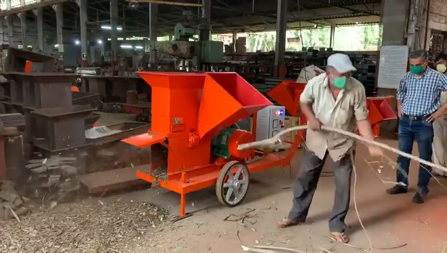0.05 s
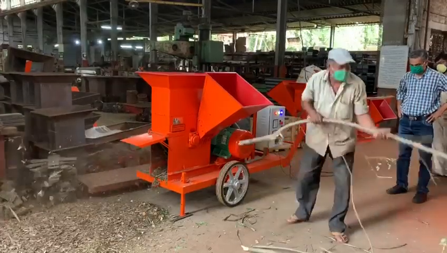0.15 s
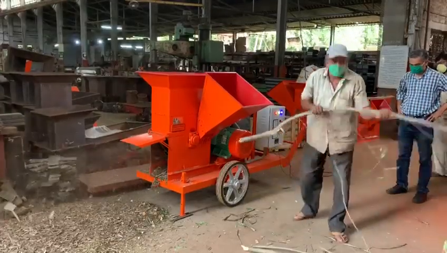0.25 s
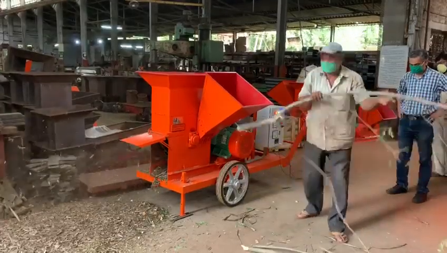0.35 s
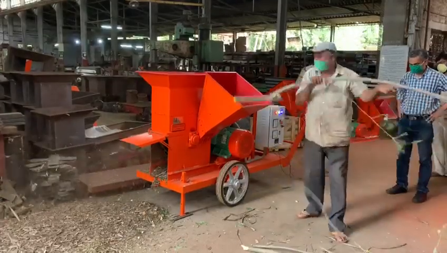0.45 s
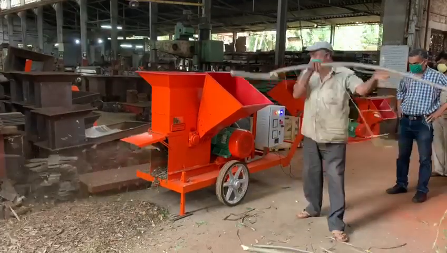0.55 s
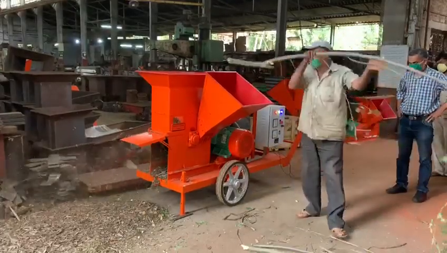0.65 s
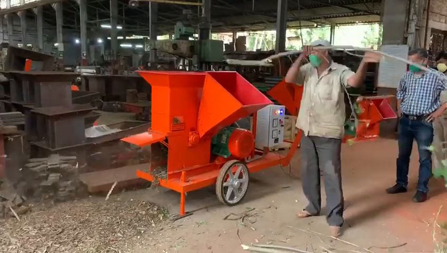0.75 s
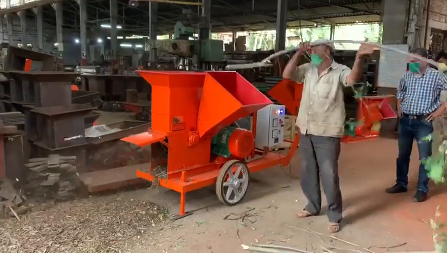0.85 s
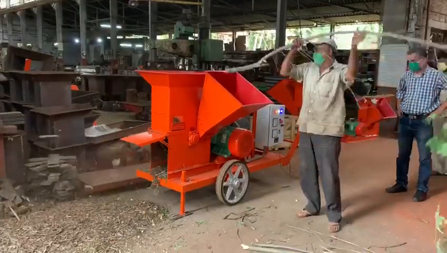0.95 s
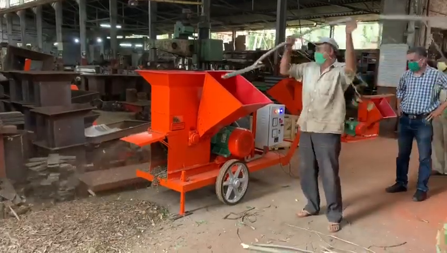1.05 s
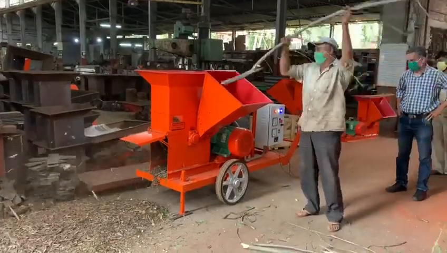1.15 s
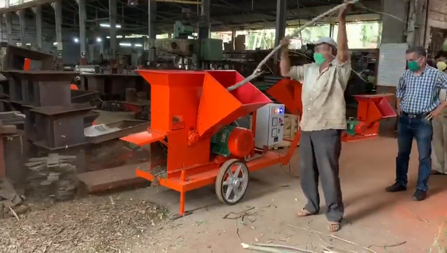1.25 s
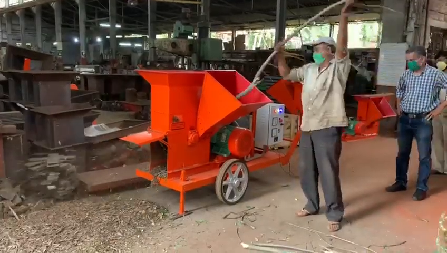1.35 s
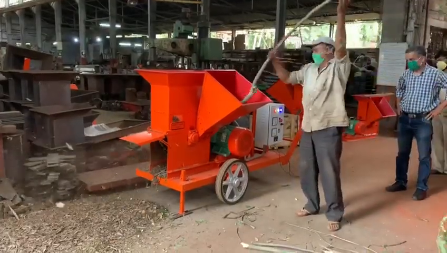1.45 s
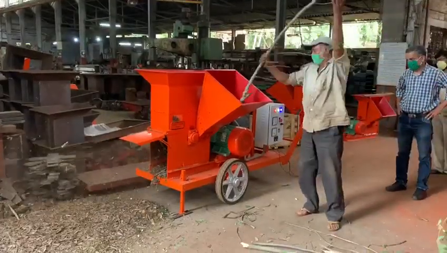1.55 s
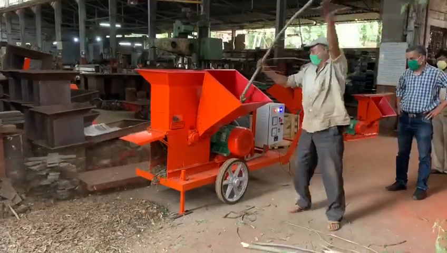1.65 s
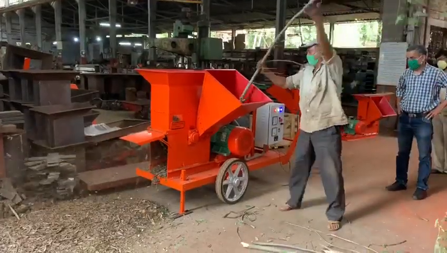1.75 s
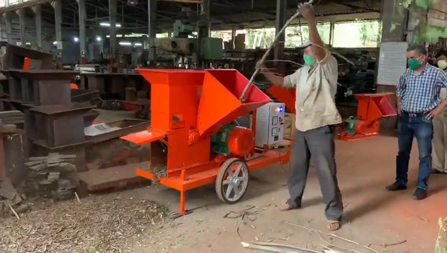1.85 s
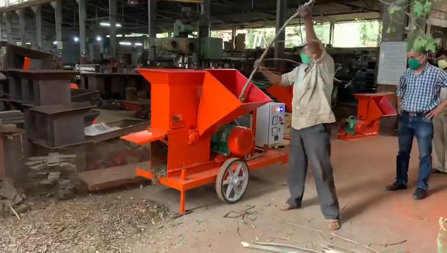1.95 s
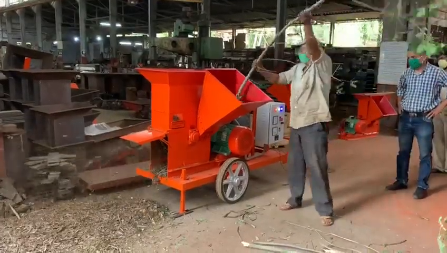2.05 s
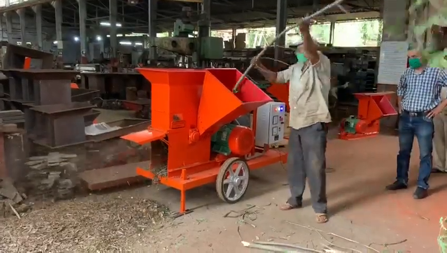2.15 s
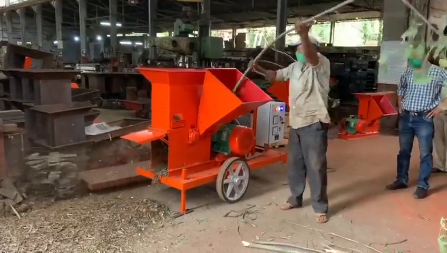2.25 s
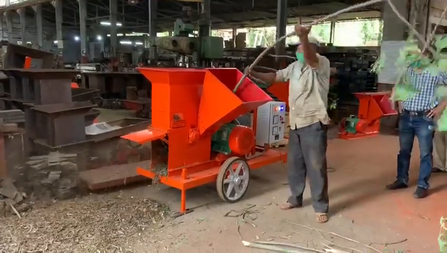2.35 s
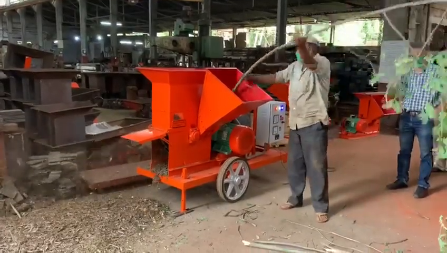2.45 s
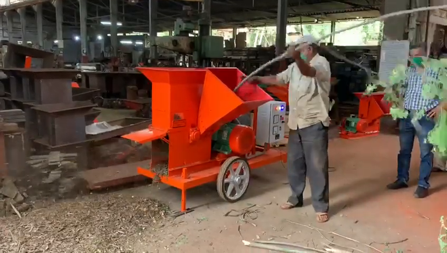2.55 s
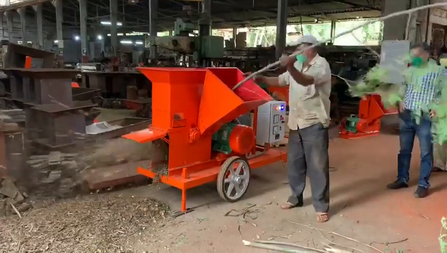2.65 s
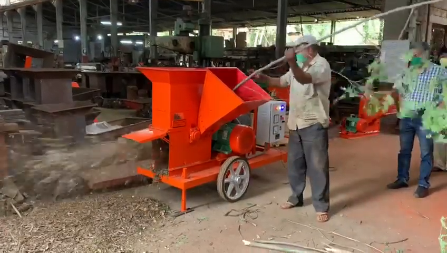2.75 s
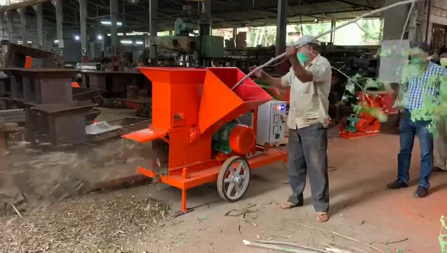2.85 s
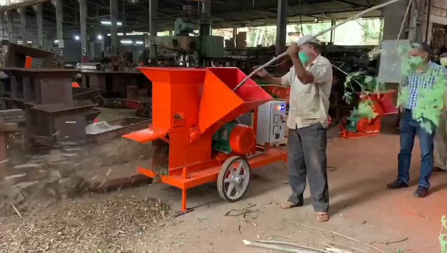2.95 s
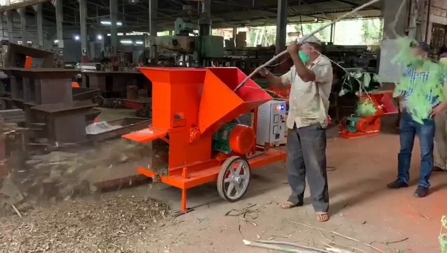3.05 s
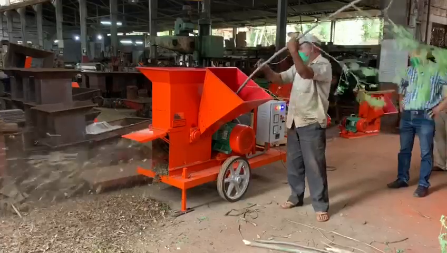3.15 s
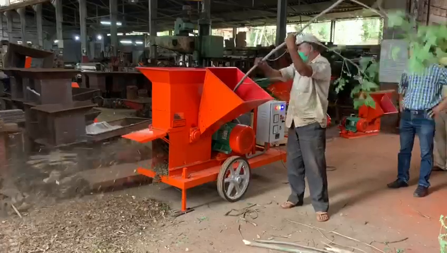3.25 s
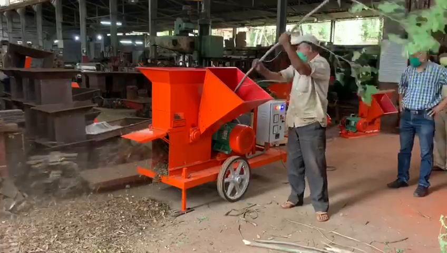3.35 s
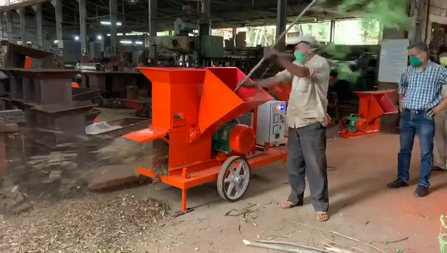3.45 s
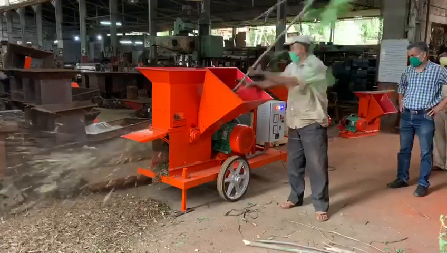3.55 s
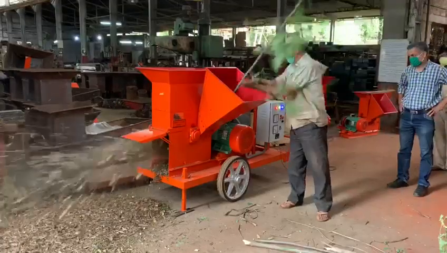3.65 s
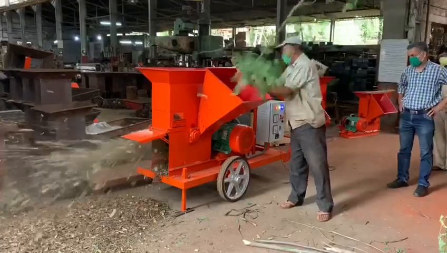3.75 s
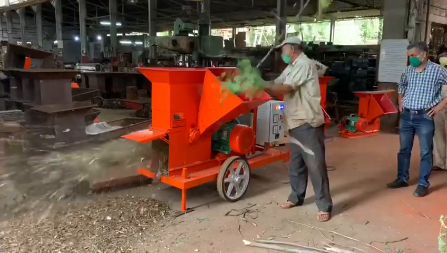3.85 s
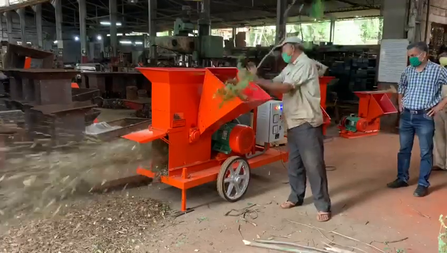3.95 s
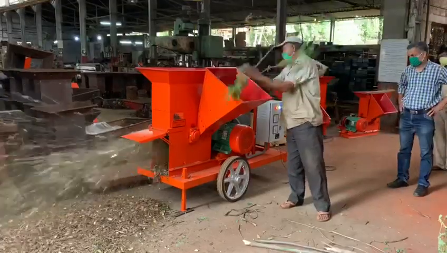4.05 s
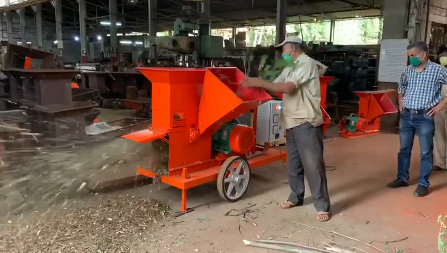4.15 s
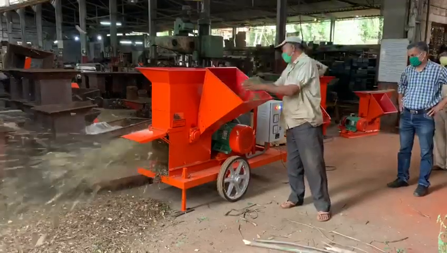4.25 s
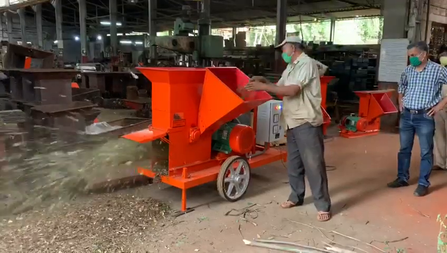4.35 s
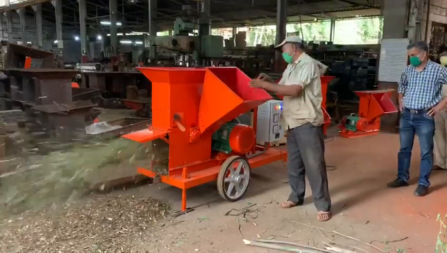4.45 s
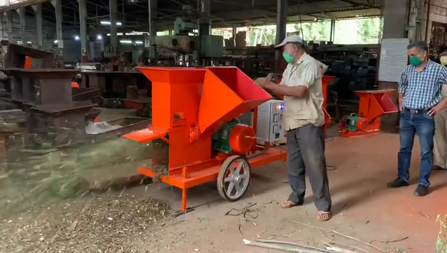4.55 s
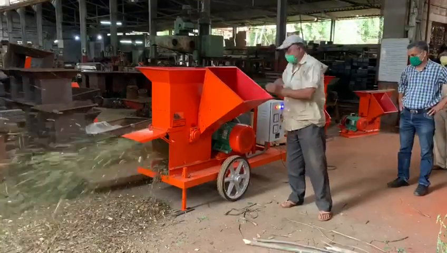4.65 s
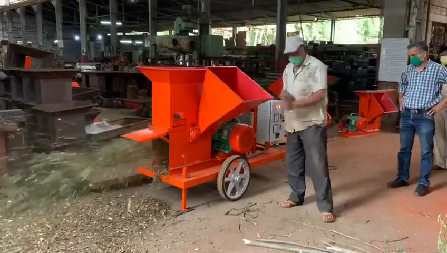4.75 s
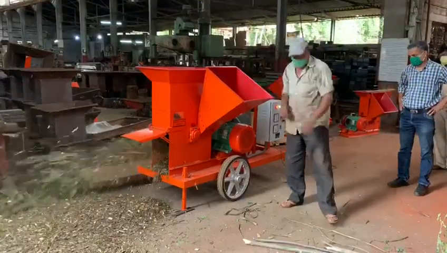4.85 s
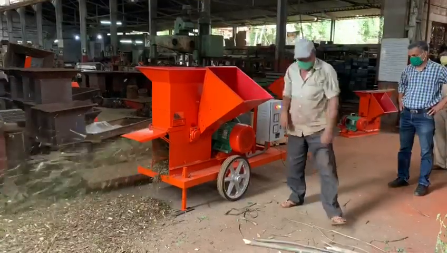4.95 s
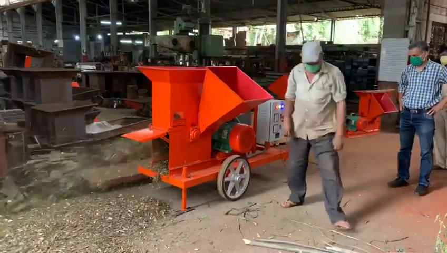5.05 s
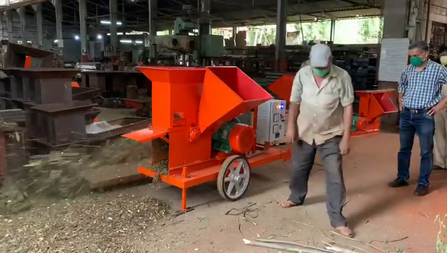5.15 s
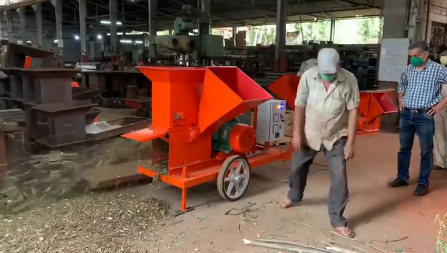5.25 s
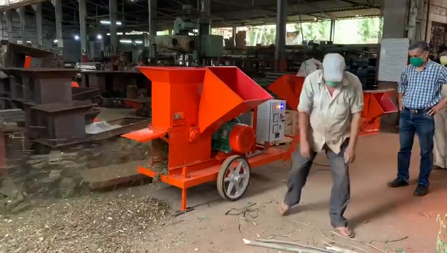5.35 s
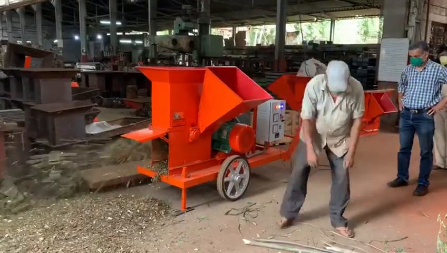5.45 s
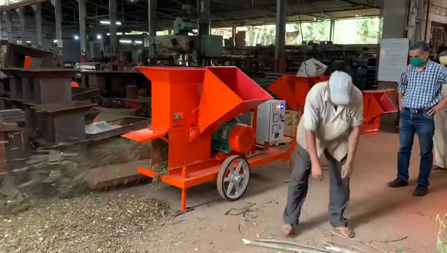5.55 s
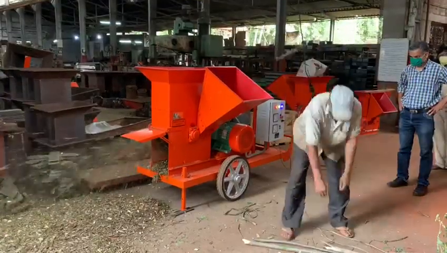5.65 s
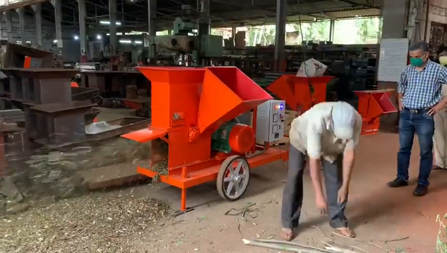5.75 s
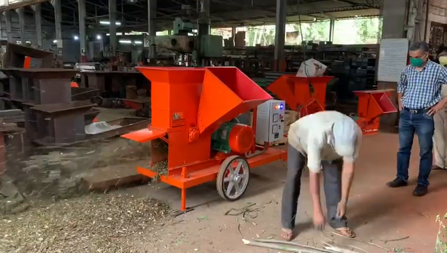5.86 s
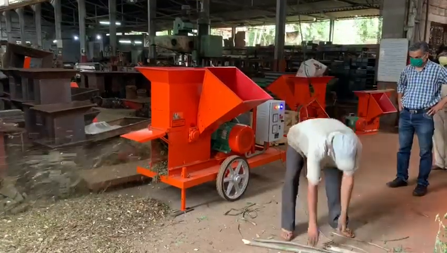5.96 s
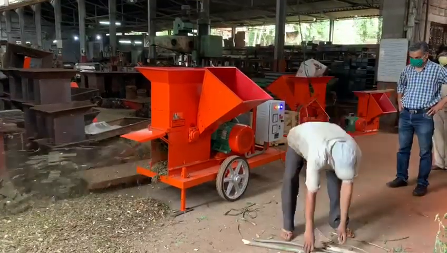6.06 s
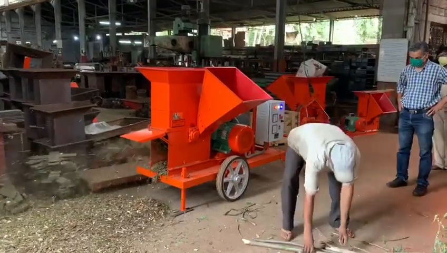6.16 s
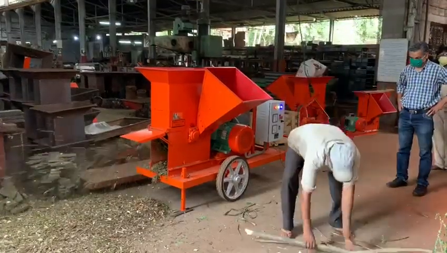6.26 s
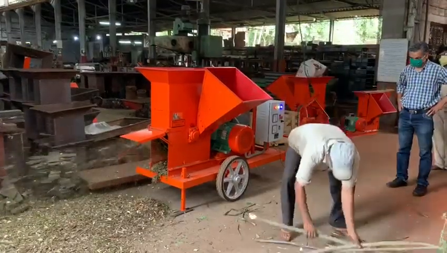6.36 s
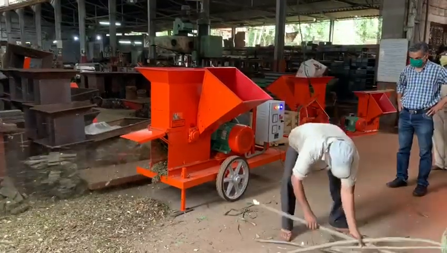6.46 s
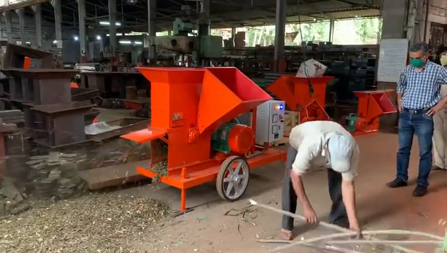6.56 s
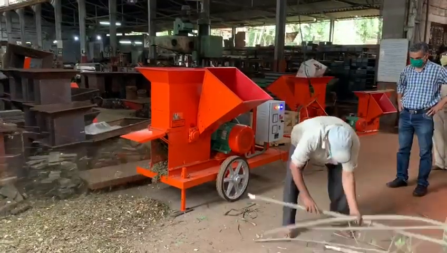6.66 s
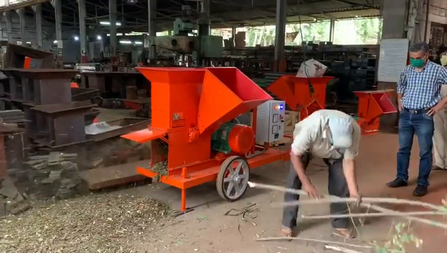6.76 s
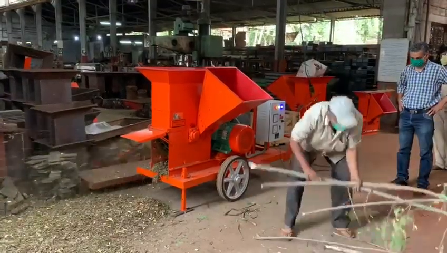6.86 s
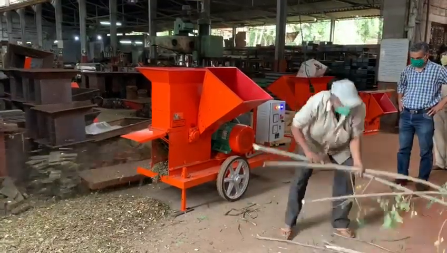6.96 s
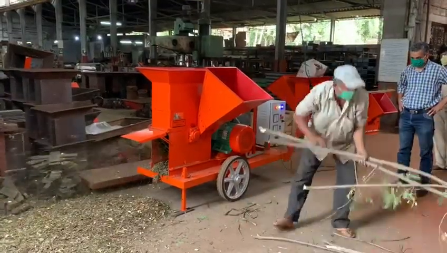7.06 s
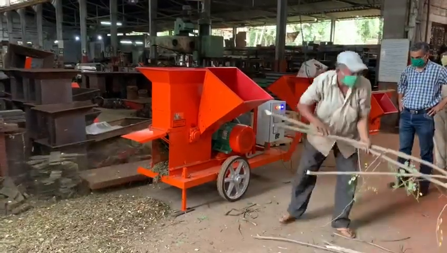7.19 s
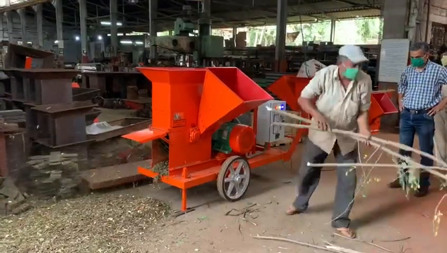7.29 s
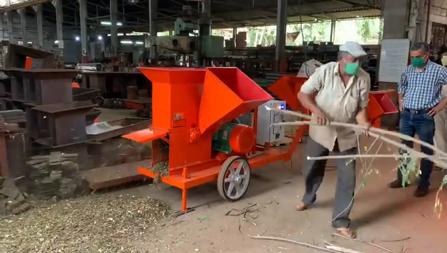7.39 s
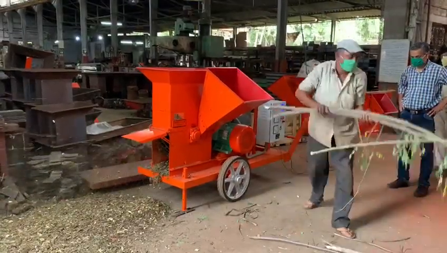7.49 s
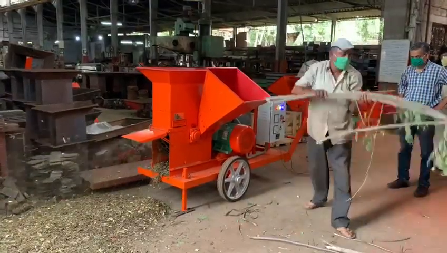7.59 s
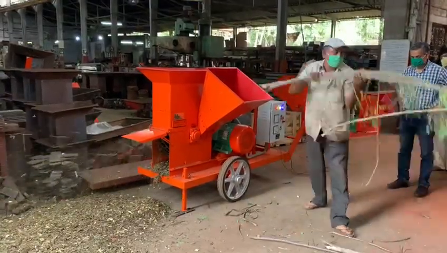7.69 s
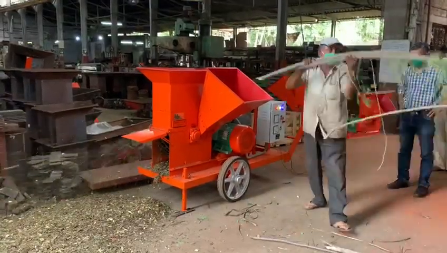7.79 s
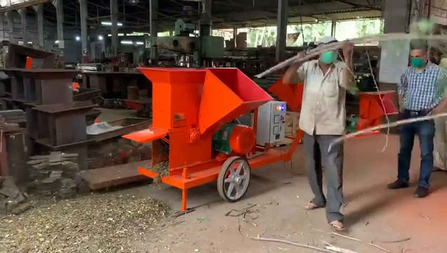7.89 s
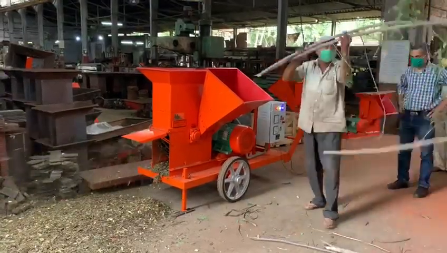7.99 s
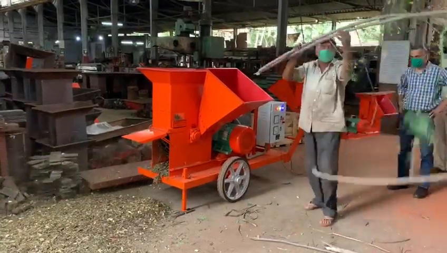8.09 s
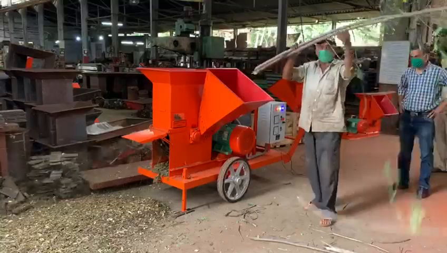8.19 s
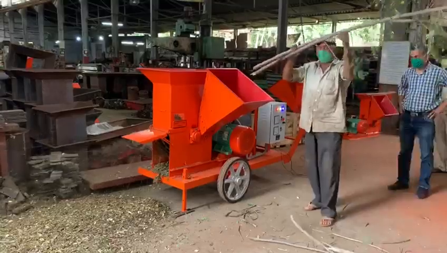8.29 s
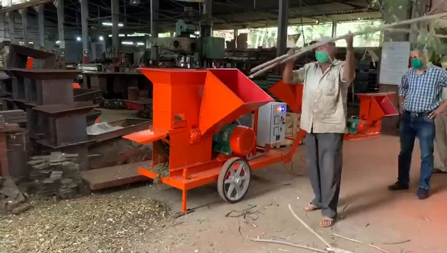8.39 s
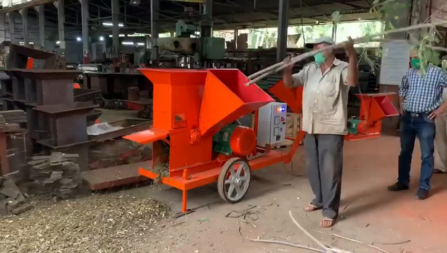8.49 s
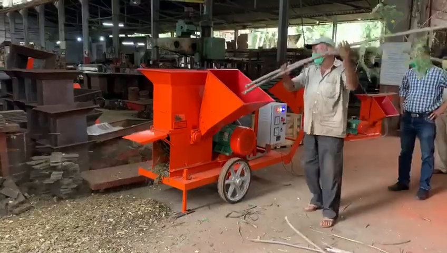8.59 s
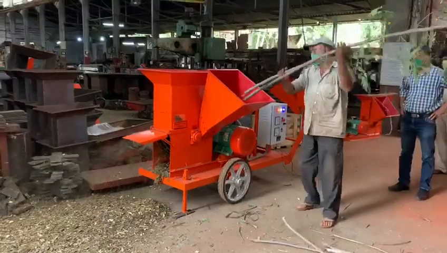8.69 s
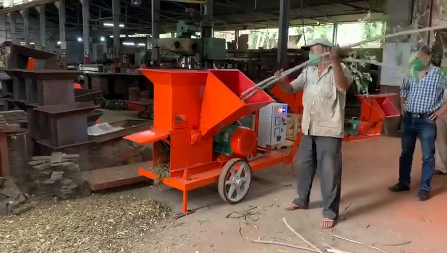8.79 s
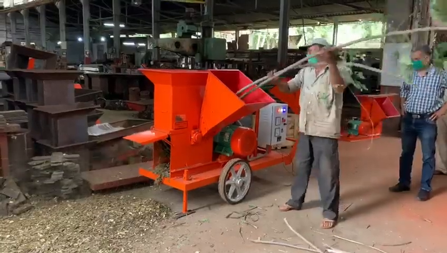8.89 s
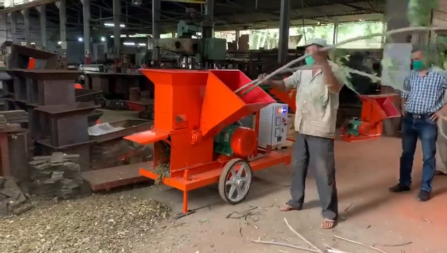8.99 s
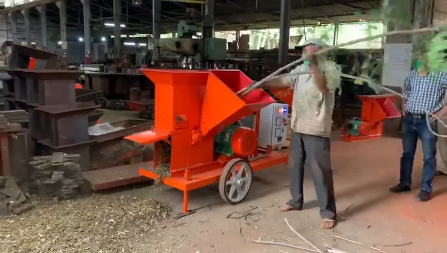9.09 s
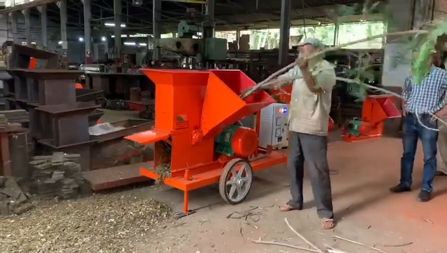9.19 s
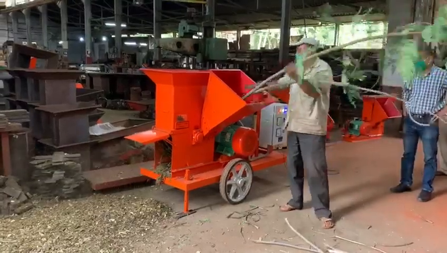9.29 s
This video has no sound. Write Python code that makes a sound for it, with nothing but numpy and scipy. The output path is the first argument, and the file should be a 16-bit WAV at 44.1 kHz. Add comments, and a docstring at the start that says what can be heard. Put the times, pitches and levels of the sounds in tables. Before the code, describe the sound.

A chipper shredder drones low and steady with rushing air, bites a branch in two loud crunches, chokes on twigs and leaves, then recovers its hum.

```python
"""An electric chipper shredder in a big workshop shed: a four-bladed rotor hums in blade and shaft tones and blows noisy air.
A branch is pulled in with two loud bites; the rotor slows, twigs and leaves choke the inlet, and the hum recovers.
Crunch, splinters, blows, snaps and rasps are noise shaped by wood and steel; stray chips tick on the housing.
The slipping belt rings its pulley in chirps, and the next branch rustles off the floor.
A camera with two close microphones stands a few metres away."""
import sys
import numpy as np
from scipy import signal
from scipy.fft import rfft, irfft, next_fast_len
from scipy.io import wavfile
from scipy.ndimage import uniform_filter1d, map_coordinates

SR = 44100
rng = np.random.default_rng(int(sys.argv[2]) if len(sys.argv) > 2 else 0)


def unload_wav(signal):
    """Save mono or channel-first audio to the path in sys.argv[1] as 16-bit WAV at rate SR, clipped to [-1, 1]."""
    wavfile.write(
        sys.argv[1],
        SR,
        np.round(np.clip(np.atleast_2d(signal).T, -1, 1) * 32767).astype(np.int16),
    )


N = 411453

IDLE_HZ = 115.72  # blade passes a second of the unloaded rotor
TOP_HZ = 11800  # the camera's band limit
CHIP_T60_S = 0.1  # a chip's tick falls 60 dB in this time

# parts of the branch in the blades: tip, tip rubbing, butt, stem, fork, side shoots, twigs, leaves, last scraps:
# (start [s], length [s], crunch before echo [dB], splinters before echo [dB],
#  drag on the blade rate [Hz], time constant of the grip [s])
WOOD = [(1.498, 0.067, -32, -36, 0, 0.022), (1.707, 1, -42, -38.5, 0, 0.017),
        (2.598, 0.091, -25, -23.5, 4, 0.013), (2.809, 0.45, -38, -36, 1.04, .007),
        (3.433, 0.11, -25, -24, 5, 0.017), (3.602, 0.12, -29.5, -31, 3, 0.0095),
        (3.764, 0.3, -32, -31, 3, .04), (4.064, 0.55, -33.5, -33.5, 0.95, 0.041),
        (4.687, 0.25, -39.5, -40.5, 0, 0.038)]
# colour of splinters and dry leaves: (frequency [Hz], relative level [dB])
SPLINTER_COLOUR = [(2000, -8), (4500, 8), (7200, 8), (10000, 8), (11700, -7)]
# colour of a chip on steel: (frequency [Hz], gain [dB])
TICK_COLOUR = [(1500, -23), (4500, -1), (6800, 16.5), (9500, 5), (11700, 1)]


def amp(db):
    """Decibels to gain."""
    return 10 ** (np.asarray(db) / 20)


def unit(x):
    """Scale to rms 1."""
    return x / np.sqrt(np.mean(x ** 2) + 1e-20)


def along(points, hz):
    """Read a curve of (frequency [Hz], value) points on a log axis."""
    f, v = np.transpose(points)
    return np.interp(np.log(hz + 1), np.log(f + 1), v)


def wobble(rate):
    """A smooth random curve, rate knots a second."""
    knots = rng.standard_normal(int(N * rate / SR) + 4)
    return map_coordinates(knots, [np.arange(N) * rate / SR])


def spell(start, length, attack, release):
    """An envelope that rises, holds and dies away; attack and release are time constants (s)."""
    t = np.arange(N) / SR - start
    rise = 1 - np.exp(-np.maximum(t, 0) / attack)
    return rise * np.exp(-np.maximum(t - length, 0) / release)


def lagged(x, seconds):
    """x followed sluggishly, with this time constant."""
    keep = np.exp(-1 / (seconds * SR))
    return signal.lfilter([1 - keep], [1, -keep], x)


def filtered(x, response):
    """x times a complex response of frequency."""
    m = next_fast_len(N + SR // 2)
    return irfft(rfft(x, m) * response(np.fft.rfftfreq(m, 1 / SR)), m)[..., :N]


def coloured(x, spectrum):
    """x shaped by (frequency [Hz], gain [dB]) points."""
    return filtered(x, lambda hz: amp(along(spectrum, hz)))


def resonate(x, modes):
    """x through parallel resonances of alternating sign: (frequency [Hz], width [Hz], gain [dB])."""
    def response(f):
        total = 0
        for k, (centre, width, db) in enumerate(modes):
            damping = 1j * f * width
            total = total + (-1) ** k * amp(db) * damping / (centre * centre - f * f + damping)
        return total
    return filtered(x, response)


def grains(rate, spread_db):
    """Two trains of tiny random impacts, rate a second, of scattered sizes."""
    hit = rng.random((2, N)) < rate / SR
    size_db = spread_db * np.minimum(rng.exponential(size=N), 5)
    return unit(hit * rng.standard_normal((2, N)) * amp(size_db))


def strokes(passes, decay, scatter_db):
    """A gain that jumps at every blade pass, each to its own size, and decays (time constant in passes)."""
    size = amp(scatter_db * rng.standard_normal(N // 100))
    return unit(size[passes.astype(int)] * np.exp(-(passes % 1) / decay))


def rotor(passes, sag, choke, clog):
    """Blade-pass hum and its octave, shaft tones, and a whine that changes colour as wood blocks the inlet."""
    # blade tones, inlet open: (multiple of the blade rate, relative level [dB])
    open_tones = [(1, -0.26), (2, -3.5), (3, -17), (4, -8.5), (5, -13), (6, -16), (7, -14.5), (8, -21.5),
                  (9, -8.5), (10, -29.5), (11, -15), (12, -19.5), (13, -15), (14, -22), (15, -18.5),
                  (16, -32.5), (19, -22.5), (23, -20.5)]
    # blade tones, inlet blocked: (multiple of the blade rate, relative level [dB])
    blocked_tones = [(3, -4.5), (4, -11), (5, -8.5), (6, -6), (7, -5.5), (8, -4.5), (9, -18.5)]
    # tones of the unequal blades: (multiple of the shaft rate, level on the hum's scale [dB])
    shaft_tones = [(2, -25.5), (3, -22), (5, -9), (7, -17), (9, -16.5), (10, -15.5), (14, -14)]

    # the octave sinks by up to 14 dB, and by half of that at a sag of 1.34 Hz
    cutting = 1 - 1 / (1 + (sag / 1.34) ** 6)
    hum = tones(passes, open_tones[:1], flutter=.04) + tones(passes / 4, shaft_tones, flutter=.05)
    octave = tones(passes, open_tones[1:2], flutter=0.053)
    open_whine = tones(passes, open_tones[2:], flutter=0.077)
    whine = (1 - choke) * open_whine + choke * tones(passes, blocked_tones, flutter=0.15)

    # each gain: dB with a clear housing, less the dB lost when fully clogged
    hum_gain = amp(-26 - 7 * clog)
    octave_gain = amp(-25 - 2.5 * clog - 14 * cutting)
    whine_gain = amp(-24 - 8.5 * clog)
    return hum_gain * hum + octave_gain * octave + whine_gain * whine


def tones(cycles, orders, flutter):
    """Stereo partials of a rotation; turbulence makes them flutter in size and phase, the high ones most."""
    # stereo width of the tones: (frequency [Hz], side against mid [dB])
    tone_width = [(115, -25.5), (230, -15.5), (460, -2.5), (1050, -4.5), (1600, -0.5), (2100, 6), (2600, 4)]
    out, knots = np.zeros((2, N)), np.linspace(0, N, 220)
    mean_hz = cycles[-1] * SR / N
    for k, db in orders:
        depth = flutter * np.sqrt(k)
        size = np.interp(np.arange(N), knots, depth * rng.standard_normal(len(knots)))
        shift = np.interp(np.arange(N), knots, depth * rng.standard_normal(len(knots)))
        # low partials add up to one pressure dip a cycle; the shed scrambles the high ones
        scramble = (k - 1) / 3 * rng.standard_normal()
        phase = 2 * np.pi * k * cycles + scramble + shift
        mid = -np.cos(phase)
        side = rng.choice([-1, 1]) * amp(along(tone_width, k * mean_hz)) * np.sin(phase)
        out += np.sqrt(2) * amp(db) * (1 + size) * np.array([mid + side, mid - side])
    return out


def load():
    """Wood drags the heavy rotor below idle (Hz), blocks the inlet and clogs the housing with slow-clearing chips."""
    # wood fills the inlet: (start [s], length [s], share blocked [0-1])
    blockages = [(2.63, 0.35, 0.5), (3.44, 1.4, 0.63)]
    inertia_s = 0.2007  # time constant of slowing down and picking up
    fill_s, clear_s, first_clog = 0.88, 2.08, 0.45  # time constants; clog at the start, 0-1

    t = np.arange(N) / SR
    drag = sum(abs(hz) * ((t >= s) & (t < s + length)) for s, length, _, _, hz, _ in WOOD)
    choke, clear = 0, 1 - first_clog * np.exp(-t / clear_s)
    for s, length, share in blockages:
        choke = choke + share * spell(s, length, attack=0.018, release=0.11)
        clear = clear * (1 - spell(s, length, fill_s, clear_s))
    return lagged(drag, inertia_s), np.clip(choke, 0, 1), 1 - clear


def shredding(passes):
    """Each blade stroke crushes wood in uneven clumps and tears off a spray of splinters."""
    # colour of crushed wood: (frequency [Hz], relative level [dB])
    crunch_colour = [(100, -46), (270, -0.5), (550, -5.5), (1100, 2), (3000, 4.5), (4400, 2), (7000, -40)]
    _, _, crunch_db, splinters_db, _, _ = np.transpose(WOOD)
    run_out_s = 0.14  # time constant of the release
    power = np.array([spell(s, length, grip, run_out_s) for s, length, *_, grip in WOOD]) ** 2
    coarse, fine = np.sqrt(amp([crunch_db, splinters_db]) ** 2 @ power)

    bite = strokes(passes, decay=10.0, scatter_db=1.0)
    clumps = amp(2.3 * wobble(60))
    fibres = bite * clumps * grains(rate=1700, spread_db=2.2)
    crunch = unit(coloured(patchy(fibres, depth_db=3), crunch_colour))
    splinters = unit(coloured(bite * grains(rate=6000, spread_db=3.0), SPLINTER_COLOUR))
    return shed(coarse * crunch + fine * splinters, wet_db=1.0)


def patchy(x, depth_db):
    """The crunch is blotchy: brief random patches of gain over time and frequency."""
    z = signal.stft(x, nperseg=256)[2]
    field = uniform_filter1d(rng.standard_normal(z.shape[1:]), size=3, axis=0)
    field = uniform_filter1d(field, size=8, axis=1)
    return signal.istft(z * amp(depth_db * unit(field)), nperseg=256)[1][:, :N]


def chops(passes):
    """Thick wood takes a few blade blows in a row, which boom in the steel housing."""
    # blows: (middle [s], standard deviation [s], relative level [dB], share of hard crack against dull thud [0-1])
    blow_times = [(2.647, 0.013, -15.5, 0.71), (2.734, 0.009, -20, 0.2), (2.759, 0.014, -21.5, 0.13),
                  (2.845, 0.012, -27, 1), (3.546, 0.013, -24.5, 0.54), (3.626, 0.0043, -22, 0.6),
                  (3.936, 0.01, -25.5, 0.15)]
    # housing under a dull thud: (frequency [Hz], width [Hz], relative gain [dB])
    thud_modes = [(266, 78, 0), (360, 76, -1), (472, 35, -11)]
    # housing under a hard crack: (frequency [Hz], width [Hz], relative gain [dB])
    crack_modes = [(473, 41, 7.5), (726, 110, -2.5), (937, 64, 3.5)]

    t, thud, crack = np.arange(N) / SR, 0, 0
    for s, spread, db, hard in blow_times:
        force = amp(db + 1.0) * np.exp(-.5 * ((t - s) / spread) ** 2)
        thud = thud + force * np.sqrt(np.clip(1 - hard, 0, 1))
        crack = crack + force * np.sqrt(np.clip(hard, 0, 1))
    blows = strokes(passes, decay=0.86, scatter_db=1.5) * rng.standard_normal((2, N))
    boom = thud * unit(resonate(blows, thud_modes)) + crack * unit(resonate(blows, crack_modes))
    return shed(boom, wet_db=-8)


def snaps():
    """A piece of wood breaks off with a hard crack of band noise, each at its own listed pitch."""
    # breaks: (time [s], starting level before echo [dB], pitch [Hz])
    breaks = [(2.633, -16, 800), (2.644, -17, 750), (2.696, -28, 2500), (2.735, -19, 1400),
              (2.762, -16, 380), (3.463, -21, 3800), (3.483, -20, 2200), (3.509, -14, 1100),
              (3.555, -18, 500), (3.662, -23, 900), (3.683, -19, 750), (3.833, -24, 2600),
              (4.13, -22, 2200)]
    t60_s, spread = 0.06, 1.5  # decay by 60 dB; band edges as a ratio to the pitch
    out, t = np.zeros((2, N + SR)), np.arange(SR // 8) / SR
    for s, db, hz in breaks:
        edges = [hz / spread, min(hz * spread, TOP_HZ)]
        band = signal.butter(1, edges, "bandpass", fs=SR)
        ring = unit(signal.lfilter(*band, rng.standard_normal((2, len(t)))))
        out[:, round(s * SR):][:, :len(t)] += amp(db - 60 * t / t60_s) * ring
    return shed(out[:, :N], wet_db=-15)


def twigs(passes):
    """Tough twigs rasp, stroke by stroke, as they are dragged through."""
    # twigs scraping in the inlet: (middle [s], level [dB])
    scrapes = [(3.66, -26), (4.06, -34.5), (4.32, -29), (4.58, -32), (4.706, -27.5)]
    # their rasp: (frequency [Hz], width [Hz], relative gain [dB])
    rasp_modes = [(1580, 314, 1), (2200, 420, 11)]
    t, spread_s = np.arange(N) / SR, 0.035  # standard deviation of a scrape
    drag = sum(amp(db) * np.exp(-.5 * ((t - s) / spread_s) ** 2) for s, db in scrapes)
    scraping = strokes(passes, decay=0.88, scatter_db=1) * rng.standard_normal((2, N))
    return drag * unit(resonate(scraping, rasp_modes))


def air(passes, clog):
    """Air and grit rush through the housing, throbbing with each turn and each blade, over the buzz of the drive."""
    # colour of the rush: (frequency [Hz], relative level [dB])
    air_colour = [(45, -20), (100, -5.5), (190, 0.5), (300, -1.5), (500, -4.5), (850, -7), (1200, -10),
                  (1900, -8), (2700, -12.5), (4300, -18), (4700, -16.5), (7500, -17.5), (11700, -21)]
    flow = rng.standard_normal((2, N))
    grit = grains(rate=900, spread_db=-0.5) * amp(1.3 * wobble(14))
    unrest_db = .45 * wobble(7) + .4 * wobble(30)
    turn_throb_db = 1.6 * np.cos(np.pi * passes / 2)
    blade_throb_db = 0.6 * np.cos(2 * np.pi * passes)

    # a clogged housing weakens the rush by up to 4 dB and the buzz by up to 5 dB
    rush = amp(-28 - 4 * clog + unrest_db) * unit(coloured(flow + 0.41 * grit, air_colour))
    return amp(turn_throb_db + blade_throb_db) * (rush + amp(-35 - 5 * clog) * buzz(passes))


def buzz(passes):
    """Bearings and housing rattle the same way at every turn: a dense comb of shaft tones around the blade tones."""
    # strength of the shaft tones: (frequency [Hz], relative level per tone [dB])
    buzz_colour = [(200, -16), (480, 0), (900, 4.5), (1400, -2.5), (2500, -10.5), (3150, -0.5),
                   (3350, -4.5), (3600, -5), (4400, -2), (4800, -30)]
    order, size = np.arange(300), 8192  # multiples of the shaft rate; samples in one turn
    hz = order * IDLE_HZ / 4
    treble = hz > 1900
    # in the treble, half multiples of the blade rate stand out by one step of 4.2 dB, full ones by two
    steps = 1. * (order % 2 == 0) + (order % 4 == 0)
    db = along(buzz_colour, hz) + 4.2 * steps * treble
    # below the treble the blade tones are left to the rotor
    apart = (order % 4 > 0) | treble
    turn = irfft(apart * amp(db) * np.exp(2j * np.pi * rng.random((2, len(order)))), size)
    angle = passes / 4 % 1 * size
    return unit(np.array([np.interp(angle, np.arange(size), side, period=size) for side in turn]))


def chips():
    """A flung chip ticks on the steel in a dying burst of noise; a heavy one adds a duller knock."""
    # chips striking the housing: (time [s], strength before colouring [dB])
    strikes = [(0.357, -28.5), (1.349, -28), (1.672, -25), (1.968, -32.5), (3.134, -25.5), (3.355, -26),
               (3.611, -30), (4.525, -23.5), (5.074, -32.5), (5.462, -25.5), (5.736, -33.5), (7.059, -30.5),
               (7.208, -31.5), (8.229, -31), (8.3983, -23)]
    # colour of the knock: (frequency [Hz], gain [dB])
    knock_colour = [(800, -30), (2500, 3), (6000, 0.5), (9000, -29)]
    tick, knock, t = np.zeros((2, N + SR)), np.zeros((2, N + SR)), np.arange(SR // 6) / SR
    attack_s = 0.0025  # time constant
    fall = (1 - np.exp(-t / attack_s)) * amp(-60 * t / CHIP_T60_S)
    heaviest_db = max(db for _, db in strikes)
    for s, db in strikes:
        burst = amp(db) * fall / fall.max() * rng.standard_normal((2, 2, len(t)))
        # the knock fades another 3.7 dB for each dB below the heaviest chip
        knock_gain = amp(3.5 + 3.7 * (db - heaviest_db))
        tick[:, round(s * SR):][:, :len(t)] += burst[0]
        knock[:, round(s * SR):][:, :len(t)] += burst[1] * knock_gain
    return coloured(tick[:, :N], TICK_COLOUR) + coloured(knock[:, :N], knock_colour)


def spray():
    """Small chips keep flying out and patter on the steel and the floor."""
    per_s, largest_db = 20, -30.5  # strength of the largest, before colouring
    t = np.arange(SR // 6) / SR
    hits = (rng.random(N) < per_s / SR) * rng.random(N) ** 2
    fall = signal.fftconvolve(hits, amp(-60 * t / CHIP_T60_S))[:N]
    return coloured(amp(largest_db) * fall * rng.standard_normal((2, N)), TICK_COLOUR)


def belt():
    """The belt slips in short fluttering spells and rings the pulley; some slips are shriller than others."""
    # chirps: (start [s], level of the low ring before echo [dB], relative shrillness [dB])
    chirp_times = [(.21, -35, 5), (1.04, -35.5, 6), (1.77, -35, 1), (5.96, -35.5, 3), (6.77, -35.5, 6),
                   (7.97, -32.5, -3), (8.72, -39, 6)]
    # the pulley's low resonances: (frequency [Hz], width [Hz], relative gain [dB])
    low_modes = [(2520, 46, -3), (3270, 57, -15)]
    # the pulley's high resonances: (frequency [Hz], width [Hz], relative gain [dB])
    high_modes = [(3630, 23, -14), (4520, 70, -21.5)]
    low, high = 0, 0
    for s, db, shrill_db in chirp_times:
        chirp = amp(db) * spell(s, length=0.11, attack=0.01, release=0.18)
        low = low + chirp
        high = high + chirp * amp(shrill_db - 4.5)
    slips = rng.standard_normal((2, N)) * amp(2 * wobble(90))
    ring = low * unit(resonate(slips, low_modes)) + high * unit(resonate(slips, high_modes))
    return shed(ring, wet_db=-8)


def gathering():
    """Dry leaves and twigs rustle in many tiny impacts as the next branch is picked up off the floor."""
    leaves = grains(rate=1300, spread_db=0.5) * amp(1.8 * wobble(22))
    rustle = unit(coloured(leaves, SPLINTER_COLOUR))
    return amp(-38) * spell(5.4, length=2.4, attack=0.028, release=0.39) * rustle


def shed(x, wet_db):
    """Add the shed's echo, a tail of decaying noise; treble dies first."""
    # echo times: (frequency [Hz], decay by 60 dB [s])
    echo_t60 = [(200, 1), (2000, 0.18), (10000, 0.053)]
    hz, t, z = signal.stft(rng.standard_normal((2, SR // 2)), SR, nperseg=256)
    decay = amp(-60 * t / along(echo_t60, hz)[:, None])
    tail = signal.istft(z * decay, SR, nperseg=256)[1]
    echo = signal.fftconvolve(x, tail / np.linalg.norm(tail[0]), axes=1)[:, :N]
    return x + amp(wet_db) * echo


def stereo_image(pair):
    """Blend two unrelated signals into left and right, with a likeness and phase that vary with frequency."""
    # (frequency [Hz], left-right likeness before the phase turn [0-1])
    likeness = [(120, .95), (400, .6), (1500, .4), (3500, .55), (4500, .25), (5900, .4), (6600, 1),
                (7500, 1), (8000, .6), (8700, .99), (9900, .98), (10500, .55), (11000, 1)]
    # from narrow to wide to opposed: (frequency [Hz], phase by which left leads [rad])
    left_lead = [(1600, 0), (1900, 2.8), (2300, 3.3), (2650, 6.8), (3200, 8.7), (5700, 10.4), (6500, 9.42),
                 (7550, 9.42), (8600, 6.28), (10300, 6.28), (10900, 3.14)]

    def blend(hz):
        turn = np.arccos(np.clip(along(likeness, hz), -1, .9995)) / 2
        return np.array([np.cos(turn), np.sin(turn)])

    mid, side = filtered(pair, blend)
    left_right = np.array([mid + side, mid - side])
    return filtered(left_right, lambda hz: np.exp(.5j * np.outer([1, -1], along(left_lead, hz))))


def scene():
    """One rotor, slowed by the wood, drives the tones and the cutting; standing waves favour one side or the other."""
    # (frequency [Hz], left over right [dB])
    left_lean = [(240, 1.4), (440, -5), (620, 6), (850, -1.3), (6000, -0.04)]
    sag, choke, clog = load()
    passes = np.cumsum(IDLE_HZ - sag) / SR  # blade passes so far
    wood = shredding(passes) + chops(passes) + snaps() + twigs(passes)
    loose = chips() + spray() + gathering()
    pair = rotor(passes, sag, choke, clog) + stereo_image(air(passes, clog) + wood + loose + belt())
    return filtered(pair, lambda hz: amp(np.outer([.5, -.5], along(left_lean, hz))))


def record(dry):
    """The camera rounds off the highest peaks and keeps nothing above its band limit."""
    rounded = dry / (1 + (dry / .75) ** 4) ** .25
    return filtered(rounded, lambda hz: hz < TOP_HZ)


dry = scene()
out = record(dry)
unload_wav(out)
```